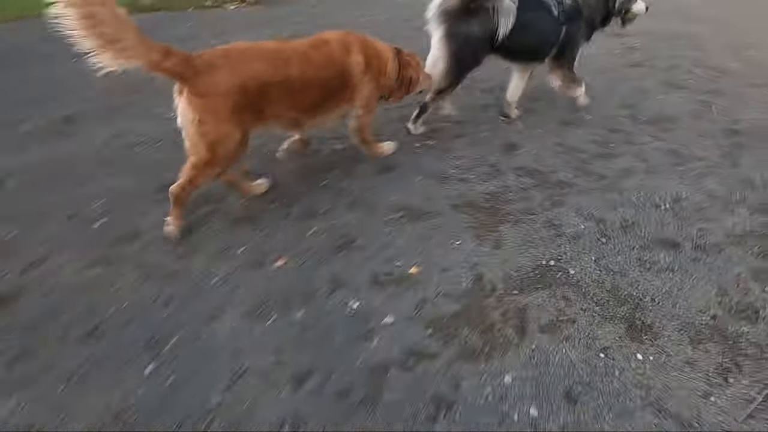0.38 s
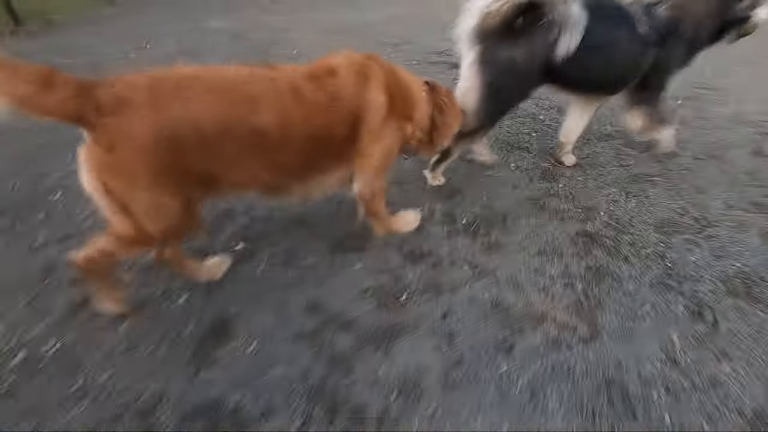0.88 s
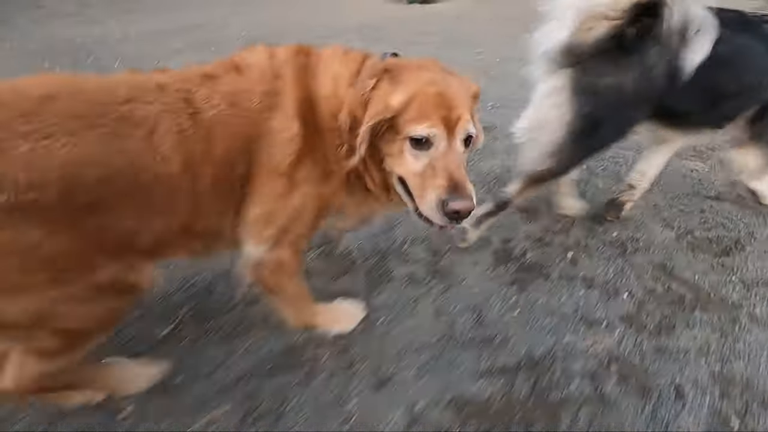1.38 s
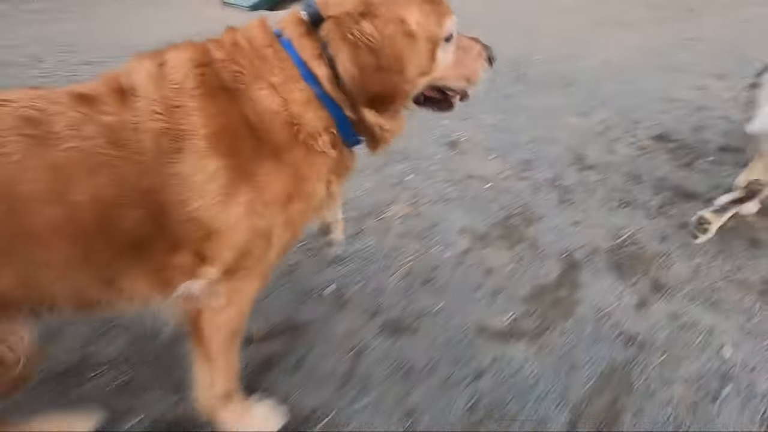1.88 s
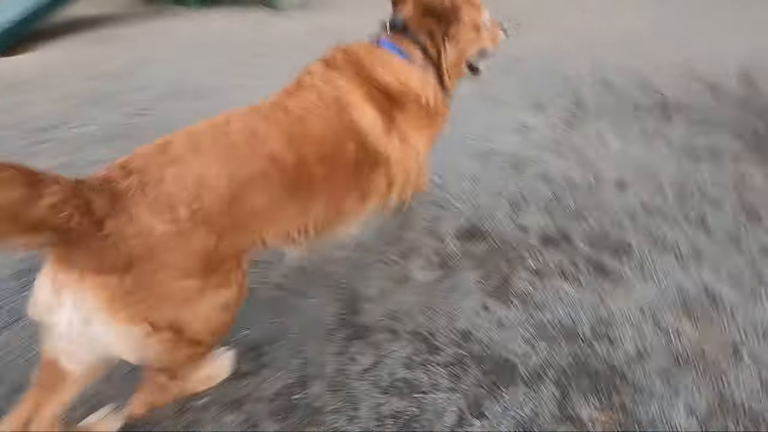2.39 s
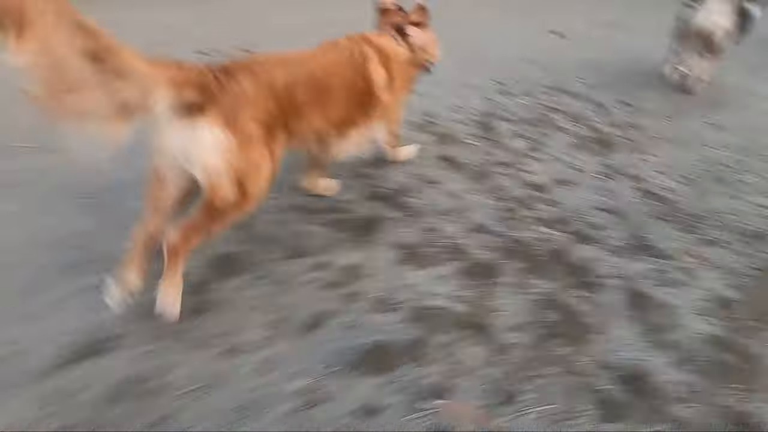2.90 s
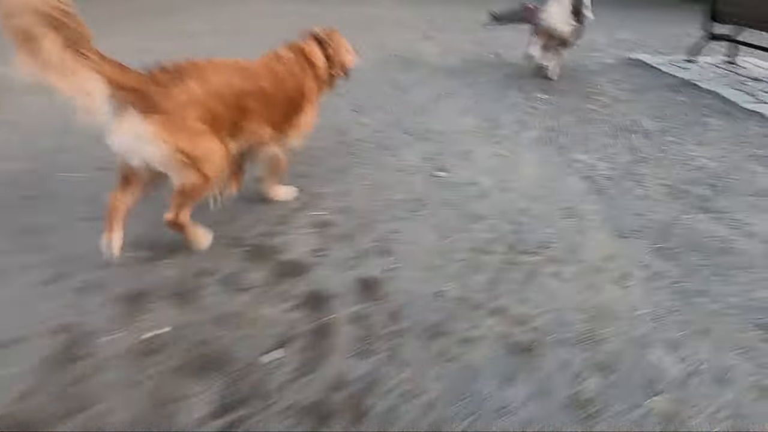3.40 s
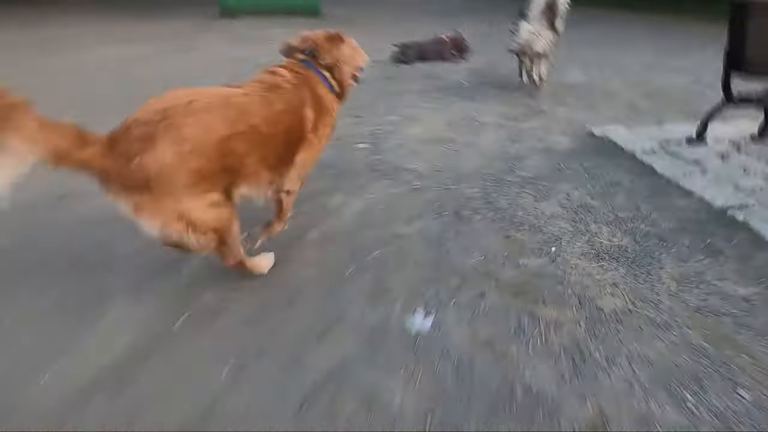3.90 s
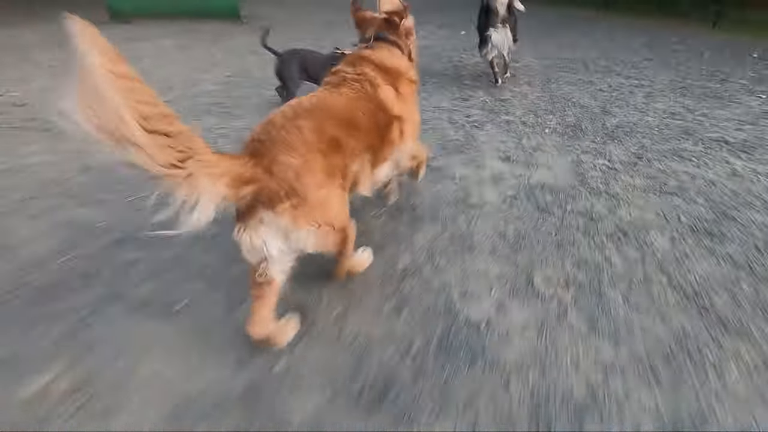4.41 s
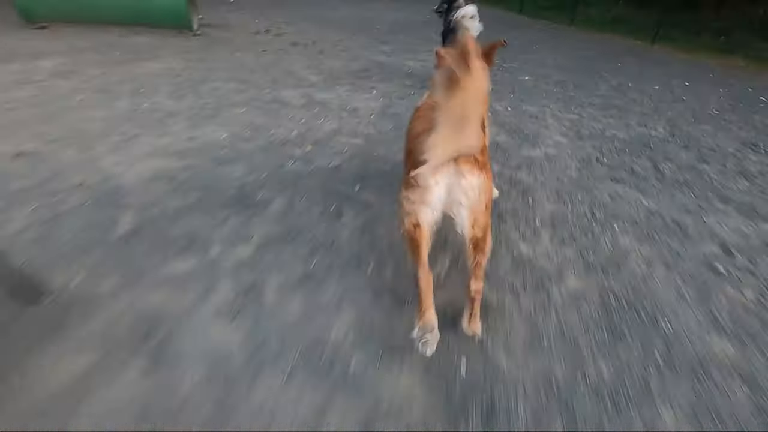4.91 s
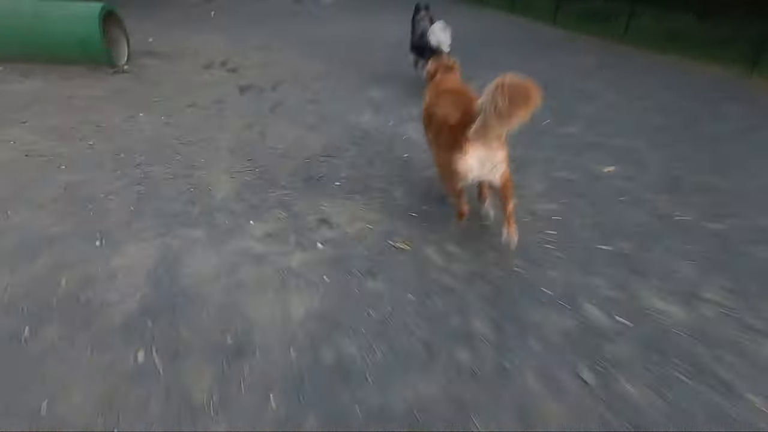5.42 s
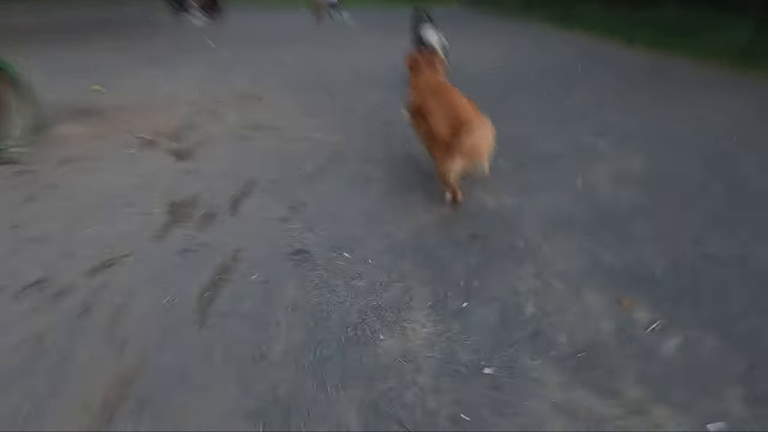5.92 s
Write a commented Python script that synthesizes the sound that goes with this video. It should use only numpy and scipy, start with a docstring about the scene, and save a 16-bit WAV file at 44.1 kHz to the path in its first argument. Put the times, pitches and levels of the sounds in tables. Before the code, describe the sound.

Close, low-held microphone moving fast over dry gravel: irregular crisp crunches overlap, each pressing quickly and settling in gritty crackle, with little stone clicks and rare tiny metallic tag ticks. Deep wind pulses swell with the swinging hand. In the last second and a half the crunching gives way to brushing hair, clattering housing knocks, thudding jolts and a tiny thin squeak. The open air is dry, with faint hiss and insects.

```python
"""Gravel crunches under the soles of a jogger and the paws of trotting dogs: bursts of tiny clicks, pressed
out and left to settle at each landing, with larger stones snapping and small ones ticking.
A small stereo camera is held low in a closed housing: headwind rumbles on its two sound ports as shaped
noise, and late on a tail and paws brush, knock and jolt it, as hair clicks, ringing modes and low swings.
Far insects (a narrow noise band) and the hiss of the open park lie below."""
import sys
import numpy as np
from scipy import signal
from scipy.fft import rfft, irfft
from scipy.io import wavfile
from scipy.ndimage import uniform_filter1d

SR = 44100
rng = np.random.default_rng(int(sys.argv[2]) if len(sys.argv) > 2 else 0)


def gain_from_decibels(decibels):
    """Convert decibel values to linear amplitude factors."""
    exponent = np.asarray(decibels, float) / 20
    return 10 ** exponent


def waveform_to_disk(signal):
    """Save audio, clipped to [-1, 1], as 16-bit WAV at the path in sys.argv[1]."""
    frames = np.transpose(np.atleast_2d(signal))
    scaled = np.clip(frames, -1, 1) * 32767
    samples = np.round(scaled).astype(np.int16)
    wavfile.write(sys.argv[1], SR, samples)


N = 266525

# how the ports colour sound from outside: (frequency [Hz], relative level per Hz [dB])
PORT_COLOUR = [(180, -24.5), (300, -18.5), (450, -22.5), (669, -19.5), (850, -13.5), (1020, -6),
               (1150, -12), (1310, 1.5), (1500, -8), (1700, -11.5), (1950, -6.5), (2280, -18.5),
               (2690, -12.5), (3400, -16), (3960, -15.5), (4600, -22), (4900, -29.5), (5900, -32.5),
               (6400, -42), (7500, -43), (8100, -56.5), (9500, -60.5), (13200, -110)]


def rms_one(x):
    """Scale to an average (rms) level of 1."""
    return x / np.sqrt(np.mean(x ** 2) + 1e-20)


def in_time(rows):
    """Draw straight lines between the rows of a curve, giving each column at every sample."""
    s, *columns = np.transpose(rows)
    return [np.interp(np.arange(N) / SR, s, c) for c in columns]


def band(x, low_hz, high_hz, order=2):
    """Keep the sound between two frequencies (Butterworth band-pass)."""
    return signal.sosfilt(signal.butter(order, [low_hz, high_hz], "band", fs=SR, output="sos"), x)


def colour(x, *spectra):
    """Filter with the summed dB curves; minimum phase, so nothing sounds ahead of its cause."""
    size = 32768
    log_hz = np.log(np.maximum(np.fft.rfftfreq(size, 1 / SR), 1))
    db = 0
    for spectrum in spectra:
        hz, level_db = np.transpose(spectrum)
        db = db + np.interp(log_hz, np.log(hz), level_db)
    # folding the cepstrum onto its first half makes the filter minimum phase
    cepstrum = irfft(db * np.log(10) / 20)
    cepstrum[1:size // 2] *= 2
    cepstrum[size // 2 + 1:] = 0
    response = irfft(np.exp(rfft(cepstrum)))
    return signal.fftconvolve(x, response)[:N]


def drift(rate_hz):
    """Random wandering of spread 1: white noise smoothed by two equal low-pass stages."""
    r = np.exp(-2 * np.pi * rate_hz / SR)
    noise = rng.standard_normal(N + SR)
    return rms_one(signal.lfilter([1], [1, -2 * r, r * r], noise)[SR:])   # drop the filter's start-up


def ring(clicks, hz, t60_s):
    """A resonance: a unit click starts a sine of about height 1 that falls 60 dB in t60_s."""
    r, w = gain_from_decibels(-60 / (t60_s * SR)), 2 * np.pi * hz / SR
    return signal.lfilter([0, np.sin(w)], [1, -2 * r * np.cos(w), r * r], clicks + 1e-18)


def sides(db):
    """Left and right gains for a left-right difference in dB."""
    return gain_from_decibels(np.array([db / 2, -db / 2]))


def evened(x, smooth_s):
    """Divide noise by its own smoothed strength, so its swings keep a fairly even height."""
    strength = np.sqrt(uniform_filter1d(x ** 2, round(smooth_s * SR)) + 1e-12)
    return rms_one(x / strength)


def struck(rows):
    """Ring one resonance for each row of (time [s], level [dB], frequency [Hz], t60 [s])."""
    out = np.zeros(N)
    for s, level_db, hz, t60_s in rows:
        click = np.zeros(SR // 4)
        click[0] = gain_from_decibels(level_db)
        out[round(s * SR):][:len(click)] += ring(click, hz, t60_s)
    return out


def grains(per_s, spread_db, clump_db, lag_s, plain):
    """Tiny contacts: clumped clicks, each around one of 15 pitches and from one of five directions."""
    grain_hz, pitch_spread = np.geomspace(250, 9000, num=15), 1.3
    patchy_db, patches_hz = 2.5, 6.7   # each pitch comes and goes on its own
    sizes = gain_from_decibels(spread_db * np.minimum(rng.exponential(1, N), 4)) * rng.choice([-1, 1], N)
    clicks = sizes * (rng.random(N) < per_s / SR) * gain_from_decibels(clump_db * drift(56))
    dealt = rng.integers(0, len(grain_hz), N)
    out = np.zeros((2, N))
    for k, hz in enumerate(grain_hz):
        own = clicks * (dealt == k) * gain_from_decibels(patchy_db * drift(patches_hz))
        pitched = band(own + 1e-18, hz / pitch_spread, hz * pitch_spread, order=1)
        own = plain * own + pitched
        left_lag_s = lag_s + .00008 * (k % 5 - 2)   # a direction is a delay between the sides
        out += np.roll(own, round(SR * left_lag_s)), own
    return rms_one(out)


def through_ports(x):
    """Sound from outside reaches each port with a slightly different colour."""
    # how the ports differ: (frequency [Hz], left-right difference [dB])
    balance = [(300, 1), (740, -7), (1230, 2), (2030, -3), (3350, 2), (5540, -13.5), (9000, 12.5)]
    return np.array([colour(x[c], PORT_COLOUR, np.array(balance) * [1, .5 - c]) for c in range(2)])


def three_ranges(x, low_hz, split_hz):
    """Split into middle and bright ranges, together of rms 1, and a low range of rms 1 on its own."""
    upper = rms_one(band(x, 500, 14000))
    ranges = []
    for kind in ("low", "high"):
        half = signal.butter(2, split_hz, kind, fs=SR, output="sos")
        ranges.append(signal.sosfilt(np.vstack([half, half]), upper))   # twice, so the two add up flat
    low = -rms_one(band(x, low_hz, 750))
    return ranges + [low]


def park():
    """Far hiss is noise through the ports; insects are noise through one narrow, wavering resonance."""
    # tilt of the far hiss, ahead of the ports: (frequency [Hz], relative level per Hz [dB])
    far_tilt = [(300, 6), (1000, -8), (1700, 2.5), (2500, -5.5), (3500, -0.5), (4600, 5.5), (6000, 7.5),
                (7500, 10), (9500, 12.5), (13000, 3.5)]
    # insect loudness, before its quick wavering: (time [s], level [dB])
    insect_levels = [(0, -65.5), (3, -61.5), (4.5, -68.5), (6.04, -89)]
    hiss_db, insect_hz = -59.5, 4295
    far = [colour(side, far_tilt) for side in rng.standard_normal((2, N))]
    hiss = rms_one(through_ports(far)) * gain_from_decibels(3.9 * drift(1.3))
    chorus = band(ring(rng.standard_normal((2, N)), insect_hz, .02), 3800, 4800)
    insect_db = in_time(insect_levels)[0] + 1.7 * drift(7.8)
    return gain_from_decibels(hiss_db) * hiss + gain_from_decibels(insect_db) * rms_one(chorus)


def headwind_db():
    """Level of the wind: as the swinging hand drives the ports through the air, each swing adds power."""
    # headwind without the swings: (time [s], level [dB])
    steady = [(0, -49), (.3, -45), (1.0, -29.5), (1.9, -33), (2.45, -36), (3.0, -31), (4.0, -25),
              (4.6, -38.5), (5.3, -34.5), (6.04, -25)]
    # swells from the swinging hand: (middle [s], level [dB], length [s])
    hand_swings = [(0.098, -40, 0.051), (0.197, -37, 0.084), (0.405, -34.5, .08), (0.557, -28, 0.11),
                   (0.79, -36, 0.21), (0.966, -27, 0.25), (1.1, -27, 0.024), (1.256, -21, .12),
                   (1.473, -28, 0.17), (1.634, -14.5, 0.082), (1.828, -27.5, .1), (2.008, -19, 0.082),
                   (2.207, -29, 0.16), (2.353, -48, 0.047), (2.58, -24, 0.093), (2.704, -24.5, .12),
                   (2.906, -23, 0.15), (3.192, -18.5, 0.32), (3.604, -17.5, 0.21), (3.752, -17.5, 0.054),
                   (4.052, -19, 0.3), (4.4, -17, 0.22), (4.804, -21, 0.25), (5.021, -23.5, 0.074),
                   (5.122, -31, 0.058), (5.265, -21, 0.11), (5.37, -21.5, 0.049), (5.497, -14.5, 0.048),
                   (5.617, -18, 0.075), (5.825, -20.5, 0.22), (5.997, -33, 0.11)]
    t = np.arange(N) / SR
    power = gain_from_decibels(in_time(steady)[0]) ** 2
    for s, db, length_s in hand_swings:
        power = power + gain_from_decibels(db) ** 2 * np.exp(-(2.85 * (t - s) / length_s) ** 2)
    return 10 * np.log10(power)


def wind():
    """Slow pressure swings, nearly alike at both ports, with a patchy quicker flutter that follows them."""
    # slow rumble: (frequency [Hz], relative level per Hz [dB])
    gusts = [(5, -61), (12, 5), (19, 12.5), (28, 2), (40, -12), (55, -14), (75, -19.5), (120, -56.5),
             (600, -140)]
    # quicker flutter: (frequency [Hz], relative level per Hz [dB])
    flutter = [(20, -29.5), (40, 9), (60, -4), (100, -6), (160, -16), (250, -25.5), (400, -37), (700, -37),
               (3000, -120)]
    mean_flutter_db, follows, lag_s = -43, 0.6, 0.21   # level at mean wind, share followed, smoothing time
    patchy_db, patches_hz = 1.5, 7.4
    rumble_db = headwind_db()
    wind_swing_db = uniform_filter1d(rumble_db - rumble_db.mean(), round(lag_s * SR))
    flutter_db = mean_flutter_db + follows * wind_swing_db + patchy_db * drift(patches_hz)
    white = rng.standard_normal((4, N))
    shared = evened(colour(white[0], gusts), 0.064) * gain_from_decibels(rumble_db)
    shared += evened(colour(white[1], flutter), 0.2) * gain_from_decibels(flutter_db)
    # a weaker part pushes the two ports in opposite directions
    opposed = rms_one(colour(white[2], gusts)) * gain_from_decibels(rumble_db - 28)
    opposed += rms_one(colour(white[3], flutter)) * gain_from_decibels(flutter_db - 17)
    return shared + opposed * [[1], [-1]]


def squeaks():
    """Something rubs the housing thinly: friction noise in one narrow resonance, swelling and fading."""
    # thin rubs: (middle [s], length [s], level at the middle [dB])
    rubs = [(5.475, 0.022, -53), (5.494, 0.0069, -31), (5.51, 0.02, -46), (5.553, 0.014, -41.5)]
    squeak_hz, t60_s = 2860, 0.012
    t = np.arange(N) / SR
    swells = sum(gain_from_decibels(db) * np.exp(-(2 * (t - s) / length_s) ** 2) for s, length_s, db in rubs)
    friction = ring(rng.standard_normal(N), squeak_hz, t60_s)
    return swells * rms_one(band(friction, 2400, 2900))


def jolts():
    """Each jolt of the hand gives a low swing that dies in a few cycles, alike at both ports."""
    # jolts: (time [s], starting level of the decay [dB], frequency [Hz], first swing out 1 or in -1)
    hand_jolts = [(2.133, -23.5, 70, -1), (4.708, -16, 90.8, -1), (4.9141, -7.5, 138, -1),
                  (4.953, -11, 111, -1), (4.996, -12.5, 88.4, -1), (5.203, -13.5, 111, -1),
                  (5.2314, -6.5, 82, -1), (5.3484, -4.5, 68.4, 1), (5.676, -12.5, 65, -1),
                  (5.737, -20, 60.6, -1), (5.759, -9.5, 72, -1), (5.833, -13, 65, -1)]
    rise_s, cycles = 0.00065, 3.64   # softened start; cycles until 60 dB down
    out, t = np.zeros(N + SR), np.arange(round(.2 * SR)) / SR
    for s, db, hz, way in hand_jolts:
        fade = gain_from_decibels(db - 60 * t * hz / cycles)
        swing = fade * np.sin(2 * np.pi * hz * t) * (1 - np.exp(-t / rise_s))
        out[round(s * SR):][:len(t)] += np.sign(way) * swing
    return out[:N]


def knocks():
    """A short uneven contact rings the housing's modes, most of all those near the contact's own pitch."""
    # knocks: (time [s], peak before panning [dB], contact centre [Hz], reach [octaves], left-right [dB])
    blows = [(4.678, -29, 1420, .25, 2), (4.856, -38, 700, 0.16, -14), (4.886, -27, 2000, 0.86, -2),
             (4.902, -32, 2500, 1.6, -9), (4.907, -20.5, 2960, 0.38, -10), (4.9129, -19, 644, 1.66, -23.5),
             (4.922, -35, 1800, 0.65, -3), (4.929, -24, 1400, 0.83, -1), (4.9508, -13.5, 750, 1.03, -16),
             (5.003, -25, 1790, 1.4, -1), (5.1469, -21.5, 3450, 0.99, -7), (5.1869, -10, 4870, 1.4, -10.5),
             (5.202, -11.5, 3860, 0.74, 10.5), (5.2335, -18.5, 3560, 1.4, 7),
             (5.3474, -4.5, 1300, 1.05, 2.5), (5.492, -37, 2000, 0.89, 0), (5.559, -27, 1530, 2.1, -1),
             (5.645, -32.5, 2930, 0.26, -1), (5.736, -25.5, 674, 0.42, -5)]
    # modes of the housing: (frequency [Hz], relative level [dB], t60 [s])
    modes = [(334, 0, 0.035), (517, 10.5, 0.014), (774, 1.5, 0.027), (1050, 9.5, 0.011), (1436, 14, 0.035),
             (1820, 11.5, 0.0051), (2080, 2.5, 0.014), (2720, 9.5, 0.015), (3200, 3.5, 0.026),
             (3666, 10, 0.0052), (4460, 6, 0.03), (5670, 7.5, 0.0093), (7840, -10, 0.0067),
             (9300, -21.5, 0.014), (12100, -11, 0.0067)]
    out, t = np.zeros((2, N)), np.arange(round(.2 * SR)) / SR
    chance = rng.standard_normal((len(blows), 2, len(modes)))   # each blow excites the modes unevenly
    contact = np.zeros(len(t))
    contact[[0, 31, 44]] = 1, -.4, .45      # the blow and two quick rebounds
    for (s, peak_db, centre_hz, reach, pan_db), luck in zip(blows, chance):
        crack = np.zeros((2, len(t)))
        for k, (hz, db, t60_s) in enumerate(modes):
            nearness = np.exp(-(np.log2(hz / centre_hz) / reach) ** 2 / 2)
            heights = (-1) ** k * gain_from_decibels(db + 2 * luck[:, k]) * nearness
            crack += heights[:, None] * ring(contact, hz, t60_s)
        cut_hz = min(centre_hz * 2 ** (1.7 * reach), .4 * SR)
        soft = signal.butter(4, cut_hz, fs=SR, output="sos")   # a longer contact is duller
        crack = signal.sosfilt(soft, crack)
        crack *= gain_from_decibels(peak_db) / np.abs(crack).max() * sides(pan_db)[:, None]
        at = round(s * SR)
        out[:, at:at + len(t)] += crack
    return out


def brush():
    """Fur strokes the housing: dense hair contacts shake it, each stroke swelling and fading."""
    # strokes: (middle [s], length [s], rub level before panning [dB], low shake above rub [dB],
    # left-right [dB])
    strokes = [(4.656, 0.062, -45, -3, -8), (4.74, 0.074, -33.5, -0.5, -6), (4.855, 0.032, -39, 5, -6.5),
               (4.912, 0.037, -29, 3.5, 5.5), (4.941, 0.017, -45, 7, -10), (4.954, 0.013, -49, 22.5, -12),
               (5.003, 0.035, -40.5, 4, -20.5), (5.069, 0.037, -42, 3.5, -5), (5.14, 0.039, -39, 0.5, -4),
               (5.18, .012, -42, -4, -2.5), (5.205, 0.074, -35, 0, -3), (5.235, 0.0089, -25.5, -0.5, -11),
               (5.279, 0.014, -46, -6, 0.5), (5.333, 0.058, -35, -6, 0.5), (5.411, 0.063, -30.5, -0.5, 0),
               (5.503, 0.17, -50.5, -1, 1), (5.562, 0.02, -37, -3, -3), (5.592, 0.048, -50, -1.5, 0),
               (5.649, 0.0075, -43, -34, -1), (5.685, 0.055, -39.5, 0.5, -1), (5.758, 0.039, -36, 4, 3.5),
               (5.832, 0.047, -39.5, 2.5, -3), (5.901, 0.081, -40, -0.5, 1), (5.968, 0.043, -43, -2, 1)]
    # colour of the hair contacts: (frequency [Hz], relative level per Hz [dB])
    fur_colour = [(80, 6.5), (190, -3), (352, -20.5), (500, -12.5), (662, -12), (1250, -7.5), (1790, -8.5),
                  (2300, -21), (2810, -11.5), (3550, -20.5), (4740, -24.5), (5990, -32.5), (7300, -38),
                  (8200, -49), (9500, -44.5), (13200, -100)]
    bright_db = -0.74   # bright range against the rub
    hairs = grains(10000, spread_db=2.5, clump_db=4.0, lag_s=.0001, plain=0.26)
    coloured = np.array([colour(side, fur_colour) for side in hairs])
    ranges = three_ranges(coloured, low_hz=99.0, split_hz=1420)
    powers, t = np.zeros((3, 2, N)), np.arange(N) / SR
    for s, length_s, db, low_db, pan_db in strokes:
        swell = np.exp(-np.abs(2 * (t - s) / length_s) ** 3)
        levels = gain_from_decibels(np.array([db, db + bright_db, db + low_db]))
        heights = levels[:, None, None] * sides(pan_db)[:, None]
        powers += (heights * swell) ** 2
    return sum(np.sqrt(power) * part for power, part in zip(powers, ranges))


def ticks():
    """Flicked pebbles ring briefly; the metal collar tag rings a little longer and purer."""
    # small stones flicked aside: (time [s], level before the band filter [dB], frequency [Hz])
    flicked = [(0.137, -42.5, 3340), (0.178, -59, 3150), (0.312, -46, 2750), (0.371, -41, 3100),
               (0.486, -59, 3770), (0.541, -45, 2720), (0.616, -45, 2680), (0.89, -36.5, 2800),
               (2.8454, -47, 3080), (2.902, -42, 3100), (2.9505, -41, 3060), (3.1986, -45, 2760),
               (3.8236, -34.5, 3020), (4.5523, -43, 3400)]
    # ticks of the tag: (time [s], level before its mode levels [dB])
    tag_ticks = [(0.746, -78), (1.569, -63.5), (1.9833, -67), (3.094, -54.5), (4.3814, -54)]
    # modes of the tag: (frequency [Hz], level against the tick [dB], t60 [s])
    tag_modes = [(9310, 11, 0.045), (13000, -11.5, .04), (14850, -8, .04)]
    pebble_t60_s = .015
    pebbles = [(s, db, hz, pebble_t60_s) for s, db, hz in flicked]
    tags = [(s, db + mode_db, hz, t60_s) for s, db in tag_ticks for hz, mode_db, t60_s in tag_modes]
    return band(struck(pebbles), 1500, 8600) + band(struck(tags), 7900, 17000)


def snaps():
    """A larger stone snaps under a sole: a click coloured by the ports and a few cycles at its own pitch."""
    # snaps: (time [s], level before the two offsets below [dB], frequency [Hz], left-right [dB])
    stones = [(0.31, -28, 1310, 5), (0.366, -55, 1280, 3), (0.406, -32, 1330, 1), (0.43, -26, 1340, -2),
              (0.487, -33, 1280, 3), (0.528, -39, 1380, 5), (0.617, -47, 1330, -1.5),
              (0.695, -32.5, 1330, -1.5), (0.765, -25, 1030, 1), (0.888, -36, 1340, -7),
              (0.921, -38.5, 1360, 1), (0.981, -29, 1240, -2.0), (1.134, -24, 1450, -0.5),
              (1.161, -21, 1320, -3), (1.297, -41, 1310, -4), (1.318, -35, 1300, 3), (1.351, -18, 1280, 0),
              (1.562, -26, 2410, 0), (1.562, -21.5, 1290, -3), (1.746, -24, 1380, 0.0),
              (1.854, -40, 3060, 2), (1.891, -35, 1900, 1.0), (1.909, -15, 1250, -1),
              (2.113, -28.5, 1080, -0.5), (2.162, -40, 1240, -2.0), (2.384, -36.5, 1280, 3),
              (2.453, -34.5, 1410, 2), (2.553, -23.5, 1390, -0.5), (2.58, -21.5, 1370, 2.5),
              (2.784, -19, 1090, -6), (2.908, -43, 1340, -2), (3.004, -19.5, 1490, 3.0),
              (3.069, -17.5, 1360, 5), (3.269, -20.5, 1040, -2.5), (3.289, -24, 1290, 1.5),
              (3.478, -25.5, 1330, -2), (3.683, -16, 1230, -4.5), (3.883, -18, 1310, -5),
              (4.076, -42, 802, 8), (4.076, -22.5, 1300, -1.5), (4.126, -23.5, 1330, 1),
              (4.261, -28, 929, 1), (4.273, -29, 1280, -5), (4.453, -23, 1180, -4),
              (4.516, -36.5, 1310, -8), (4.643, -33.5, 1380, -7)]
    ring_db, click_db, cycles = -12, -12.5, 8.9   # offsets; cycles until 60 dB down
    clicks, out = np.zeros((2, N)), np.zeros((2, N))
    for s, db, hz, pan_db in stones:
        at = round(s * SR)
        # of two stones at one instant, only the later row's click is heard; both ring
        clicks[:, at] = gain_from_decibels(db + click_db) * sides(pan_db)
        body = ring(np.eye(1, 2000)[0], hz, cycles / hz)
        out[:, at:][:, :2000] += gain_from_decibels(db + ring_db) * sides(pan_db)[:, None] * body
    unit = np.abs(colour(np.eye(1, 2000)[0], PORT_COLOUR)).max()   # peak of one coloured click
    return out + band(through_ports(clicks), 360, 4200) / unit


def gravel():
    """Each landing presses the stones quickly and lets them settle; loose ones roll in between."""
    # heels, toes and paws landing: (time [s], level before the offsets below [dB], settling t60 [s],
    # thud against that level [dB], extra brightness [dB])
    landings = [(0.05, -32.5, 0.32, -23, 1), (0.311, -41, 0.12, -16, 4), (0.363, -35.5, 0.04, -34, 3.5),
                (0.404, -34, 0.067, -34, 1.5), (0.429, -19.5, 0.1, -47, -2), (0.461, -30, 0.088, -32, -1.5),
                (0.487, -33, 0.28, -39, -0.5), (0.699, -25, 0.24, -31, 3), (0.765, -28.5, 0.38, -26, -2.5),
                (0.887, -43, 0.094, -23, 2), (0.921, -23.5, 0.14, -19, 5), (0.975, -31, 0.28, -21, 3),
                (1, -30.5, 0.13, -38, 3.5), (1.134, -21.5, 0.51, -31, -4), (1.155, -27.5, 0.23, -31, -2),
                (1.213, -29, 0.54, -32, 0), (1.297, -42, 0.18, -25, -6), (1.321, -32, 0.54, -27, 2),
                (1.35, -21, 0.23, -19.5, -0.5), (1.372, -24, 0.25, -32, -4.5),
                (1.557, -18.5, 0.17, -32, -1.5), (1.601, -28, .13, -25, -7), (1.67, -32.5, 0.27, -29, -2),
                (1.746, -21, 0.072, -25.5, 4), (1.796, -30.5, 0.043, -24, 3),
                (1.908, -23.5, 0.24, -22.5, -2), (1.97, -28.5, 0.11, -50, -5), (2.11, -28.5, 0.15, -33, 1),
                (2.13, -27.5, 0.23, -21.5, -4), (2.158, -32.5, 0.13, -31, -6),
                (2.385, -30.5, 0.069, -14.5, 7.5), (2.45, -39.5, 0.52, -21, 2),
                (2.553, -17.5, 0.13, -25.5, -2.5), (2.582, -22, 0.11, -36, -2),
                (2.777, -25.5, 0.5, -34, -2.5), (2.81, -23, 0.045, -45, -1), (2.907, -32.5, 0.37, -20.5, 5),
                (3.004, -31.5, 0.065, -25, -1), (3.069, -21.5, 0.27, -19, -1), (3.193, -27, 0.088, -48, 1),
                (3.213, -23, 0.068, -24, -2), (3.269, -24.5, 0.054, -25, -4), (3.288, -23, 0.18, -56, 0.5),
                (3.422, -24, 0.17, -42, -1), (3.474, -17.5, 0.15, -59, -1), (3.502, -28, 0.016, -3.5, 4),
                (3.679, -24.5, 0.47, -69, 0.5), (3.88, -16.5, 0.17, -27, 1), (3.899, -41, 0.07, -8, -9),
                (3.934, -32.5, 0.099, -54, 2), (4.07, -16, 0.17, -23.5, 3), (4.123, -23.5, 0.12, -57, -3),
                (4.276, -20, 0.044, -20, 1.5), (4.288, -22.5, 0.22, -23.5, -0.5),
                (4.451, -22, 0.26, -16, 0.5), (4.516, -23, 0.042, -45, -4), (4.68, -21.5, 0.046, -12, 0.5),
                (4.71, -31.5, 0.27, -3.5, -12)]
    # loose stones rolling between the steps, before wandering: (time [s], level [dB])
    loose = [(0.0, -56.5), (0.15, -44.5), (0.5, -55), (0.8, -53), (1.33, -56), (1.7, -47), (1.9, -55.5),
             (2.86, -51), (3.73, -45), (4.05, -48.5), (4.25, -49), (4.51, -54.5), (4.71, -47), (5.0, -53.5),
             (5.18, -41.5), (5.3, -53), (5.57, -47.5), (5.94, -38.5), (6.04, -55.5)]
    # finer ground is brighter: (time [s], change of the bright range [dB])
    ground = [(0, -2.5), (.8, 2), (1.7, 3.5), (2.4, 5.5), (3.2, -4), (4.0, -5), (4.8, 4), (6.04, -13.5)]
    crunch_db, grit_db, loose_grit_db = -9, -12, -0.5   # offsets of the middle and bright ranges
    base_rise_s, rise_per_settling = 0.0055, 0.023   # a slow-settling step also loads slowly
    stones = grains(5000, spread_db=2.5, clump_db=1.5, lag_s=.00012, plain=0.16)
    ranges = three_ranges(through_ports(stones), low_hz=180.0, split_hz=1530)   # crunch, grit, thud
    loads, t = np.zeros((3, 2, N)), np.arange(round(.3 * SR)) / SR
    for s, db, t60_s, thud_db, bright_db in landings:
        rise_s = max(base_rise_s + rise_per_settling * t60_s, .001)
        pressing = np.minimum(t / rise_s, 1) ** 1.03
        settling = gain_from_decibels(-60 * np.maximum(t - rise_s, 0) / max(t60_s, .01))
        levels = gain_from_decibels(np.array([db + crunch_db, db + grit_db + bright_db, db + thud_db]))
        at = round((s - rise_s / 2) * SR)      # the sole loads the stones just before they give
        loads[:, :, at:at + len(t)] += (levels[:, None, None] * pressing * settling) ** 2
    loose_db, = in_time(loose)
    loads[0] += gain_from_decibels(loose_db + 0.95 * drift(22)) ** 2
    loads[1] += gain_from_decibels(loose_db + loose_grit_db + 1.2 * drift(9.1)) ** 2
    loads[1] *= gain_from_decibels(in_time(ground)[0]) ** 2
    return sum(np.sqrt(load) * part for load, part in zip(loads, ranges))


def scene():
    """All sources added up at the two ports."""
    return wind() + gravel() + snaps() + brush() + knocks() + jolts() + ticks() + park() + squeaks()


def top_cut(x):
    """Nothing passes above the cut-off."""
    return signal.sosfilt(signal.butter(12, 15100, fs=SR, output="sos"), x)


def record(dry):
    """The converter tops out at full scale."""
    mix = np.clip(dry, -1, 1)
    return top_cut(mix)


dry = scene()
out = record(dry)
waveform_to_disk(out)
```